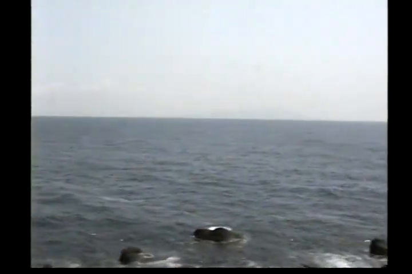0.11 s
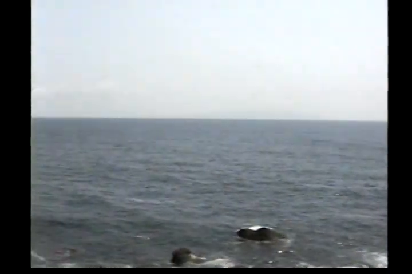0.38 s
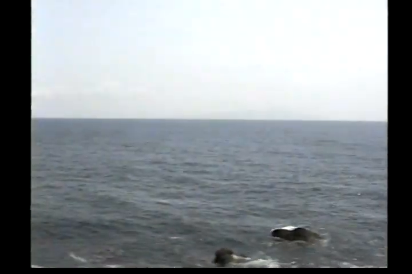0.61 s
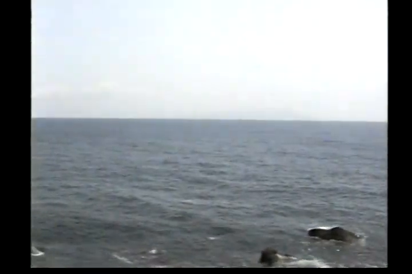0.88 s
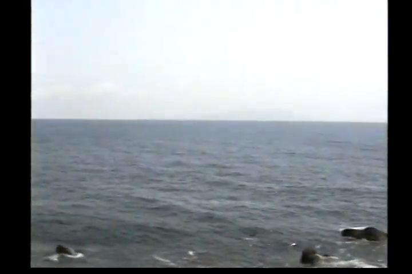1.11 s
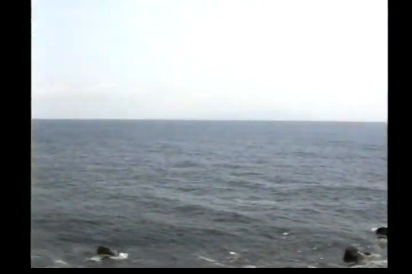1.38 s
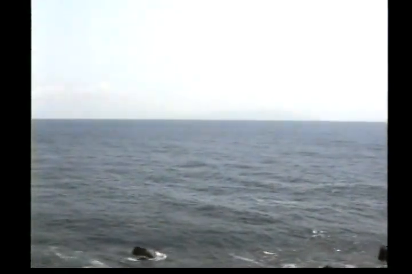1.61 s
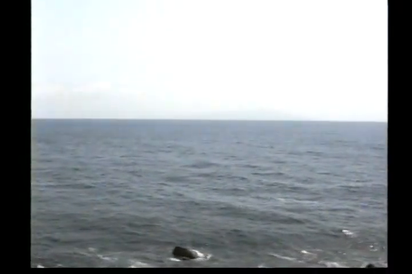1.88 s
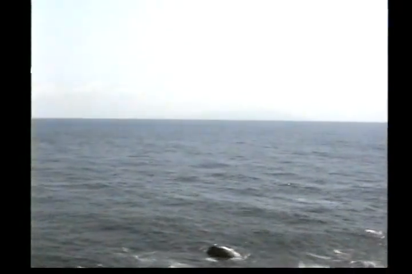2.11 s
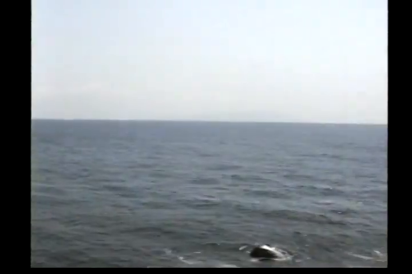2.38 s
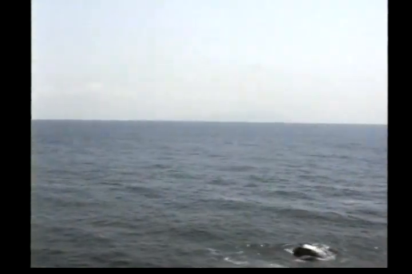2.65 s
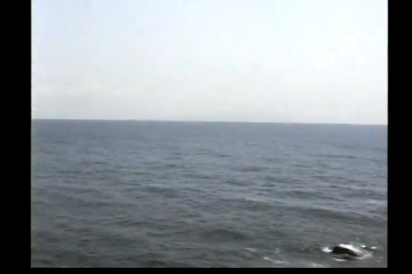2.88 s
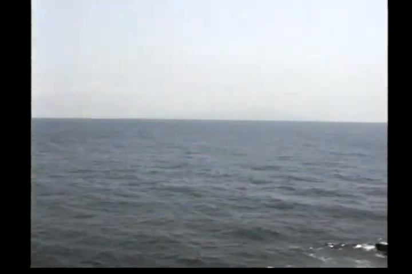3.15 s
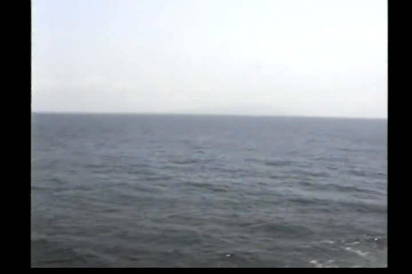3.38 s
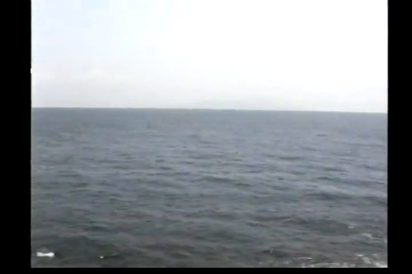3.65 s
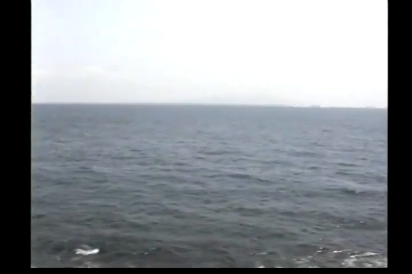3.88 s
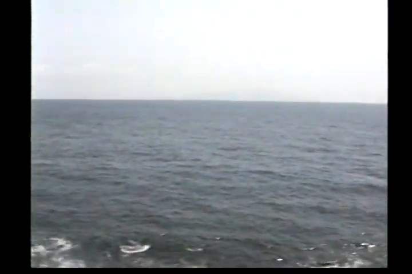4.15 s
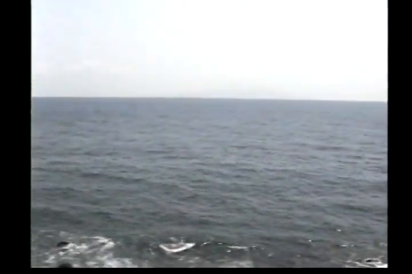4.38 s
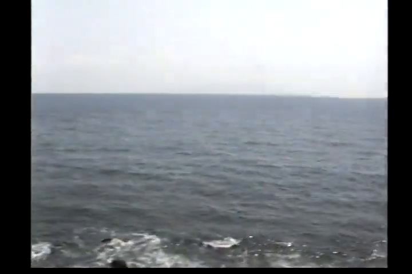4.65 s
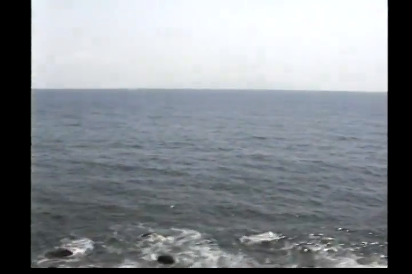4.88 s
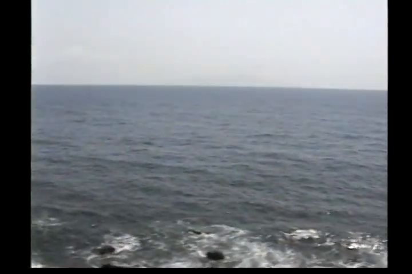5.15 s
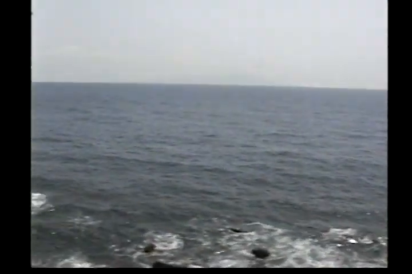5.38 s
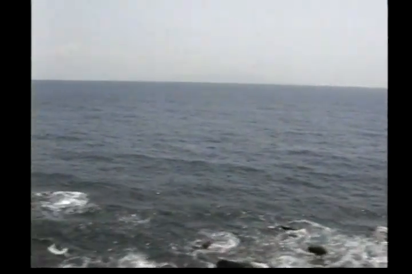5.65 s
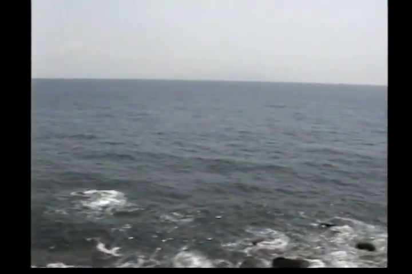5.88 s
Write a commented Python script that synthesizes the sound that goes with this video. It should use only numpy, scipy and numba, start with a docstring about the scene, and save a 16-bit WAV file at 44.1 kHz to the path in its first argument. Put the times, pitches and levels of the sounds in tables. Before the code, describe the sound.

On board an electric train, close to an open window by the sea. A rough, steady wheel roar with airy hiss runs throughout over a motor hum of constant pitch, near 300 hertz with higher overtones. Wind hits the microphones at once, with a strong thump at 0.36 s that ducks the whole sound before it creeps back. A hard clack lands at 0.65 s. The image is narrow, widens from 1 to 2 s, then narrows again. From 2.1 to 3.4 s clacks, sharp ticks and chattering metal thicken, and the roar swells around 3 s. More gusts pump the level near 3.8-4.1 s. Rattles return at 4.5-4.8 s as the hum surges, then drops at about 4.85 s, with a weak return near 5.6 s. The sound is wide again, with fluttering buffets around 5.1 s and sharp metal blows at 5.94 s.

```python
"""Windy train window

On board an electric train by the sea, two microphones at an open window: filtered noise makes wheel roar and
air hiss, sines the motor hum, rung noise bursts the axles' clacks over rail joints and loose metal's chatter.
Wind buffets the microphones with short low waves and pumps the gain control;
a loose contact flips the sound between two microphones and the right one alone."""
import sys
import numpy as np
from scipy import signal
from scipy.io import wavfile
from scipy.ndimage import uniform_filter1d, minimum_filter1d
from numba import njit

SR = 44100
rng = np.random.default_rng(int(sys.argv[2]) if len(sys.argv) > 2 else 0)


def gain_from_decibels(decibels):
    """Convert decibel values to linear amplitude factors."""
    exponent = np.asarray(decibels, float) / 20
    return 10 ** exponent


def store_pcm(level_fs):
    """Save levels as 16-bit WAV."""
    pcm = np.round(np.clip(level_fs, -1, 1) * 32767).astype(np.int16)
    wavfile.write(sys.argv[1], SR, np.atleast_2d(pcm).T)


N = 265257

# wheel roar ahead of the gain control, right side: (time [s], level [dB])
ROAR_LEVEL = [(0, -23), (.15, -26), (.3, -23), (.4, -26.5), (.55, -27), (.86, -23), (.9, -24.5),
              (.94, -23.5), (1.02, -23), (1.12, -24.5), (1.25, -23.5), (1.4, -26.5), (1.55, -27),
              (1.68, -27), (2.05, -27), (2.27, -23.5), (2.4, -25.5), (2.85, -28.5), (3.0, -19),
              (3.3, -20.5), (3.5, -28), (3.87, -28.5), (4.0, -28), (4.15, -27.5), (4.4, -28), (4.48, -25),
              (4.64, -22.5), (4.66, -27.5), (4.72, -24.5), (4.8, -22.5), (4.86, -27), (5.0, -29),
              (5.25, -25.5), (5.55, -30.5), (6.01, -25)]
# low wind rumble on the microphones: (time [s], level [dB])
RUMBLE_LEVEL = [(0, -61), (.2, -45), (.33, -45), (.4, -49), (.5, -51), (.6, -40.5), (1.0, -42), (1.05, -65),
                (1.22, -62), (1.3, -47.5), (1.8, -46), (1.88, -64), (2.1, -56), (2.3, -38.5), (2.5, -54),
                (2.57, -69), (2.72, -51), (2.9, -45), (3.35, -39), (3.42, -56), (3.58, -54), (3.8, -38.5),
                (4.3, -42.5), (4.42, -64), (4.5, -41), (4.65, -52), (5.0, -42.5), (5.2, -42), (5.45, -42),
                (5.75, -38), (6.01, -39.5)]
THRESHOLD_DB = -27  # of the gain control
JOLT_LEFT_DB = 3.5  # impacts: left over right


def unit(x):
    """Scale to rms 1."""
    return x / np.sqrt(np.mean(x ** 2))


def curve(table, column):
    """One column of a table, sample by sample."""
    points = np.array(table)
    return np.interp(np.arange(N) / SR, points[:, 0], points[:, column])


def band(x, hz, width_hz):
    """Band-pass along time."""
    edges_hz = [max(hz - width_hz / 2, 10), min(hz + width_hz / 2, .45 * SR)]
    return signal.sosfilt(signal.butter(2, edges_hz, "bandpass", fs=SR, output="sos"), x)


def walk(rate_hz):
    """Random levels held 1 / rate_hz s and slewed twice; spread near 1."""
    k = int(SR / rate_hz)
    steps = np.repeat(rng.standard_normal(N // k + 1), k)
    return 1.31 * uniform_filter1d(uniform_filter1d(steps, k), k)[:N]


def add(out, s, sound):
    """Mix a short sound in, centred on s."""
    i = int(s * SR) - sound.shape[1] // 2
    out[:, i:i + sound.shape[1]] += sound[:, :N - i]


def swell():
    """How far the roar stands above its usual level, in dB."""
    usual_db = -24
    return curve(ROAR_LEVEL, 1) - usual_db


def rushing(spectrum, flutter_db, flicker_db, rate_hz, treble_db):
    """Noises a third of an octave apart flutter together and flicker alone, the bass most."""
    # share of the right side's noise added on the left, negative = opposite: (frequency [Hz], share)
    likeness = [(60, -.8), (300, -.3), (900, .0), (2200, -.5), (4500, .45)]
    like_hz, share = np.transpose(likeness)
    hz, db = np.transpose(spectrum)
    out, flutter = 0, walk(rate_hz)
    for f in hz[0] * 2 ** np.arange(1 / 6, np.log2(hz[-1] / hz[0]), 1 / 3):
        flicker = flicker_db * (1 + 175.0 / max(f, 90.)) * walk(rate_hz)
        gain_db = np.interp(np.log(f), np.log(hz), db) + flutter_db * flutter + flicker
        gain_db = gain_db + treble_db * np.clip(2 * np.log2(f / 920.0), 0, 1)
        noise = rng.standard_normal((2, N))
        noise[0] += np.interp(np.log(f), np.log(like_hz), share) * noise[1]
        out = out + gain_from_decibels(gain_db) * band(noise, f, f / 4)
    return unit(out)


def rush():
    """Wheel roar and air hiss swell together; the left microphone faces the window."""
    # spectra: (frequency [Hz], relative density [dB per Hz])
    roar_spectrum = [(25, 4.5), (50, -10), (80, -25.5), (140, -13), (200, -14.5), (300, -1), (420, 1.5),
                     (820, -1), (1100, -4), (1350, -9), (1600, -16.5), (1850, -16), (2200, -16),
                     (2800, -23), (3500, -28.5), (4500, -32.5)]
    hiss_spectrum = [(2500, -3.5), (3700, -0.5), (4500, -2.5), (6600, 3.5), (8200, -6), (9500, 0),
                     (10800, -14)]
    # over the usual share: (time [s], treble of the roar [dB], hiss [dB])
    treble = [(0, -1.5, 3), (.2, -2.5, 1), (.45, -1.5, .5), (.8, 0, -0.2), (1.2, 1, -1.3), (1.8, 1.5, 0.1),
              (2.4, -0.2, 1.2), (3.1, 1.5, -1), (3.6, -0.4, -0.6), (4.2, 0, 2.5), (4.6, 2.3, 0),
              (5.2, 0.8, -1), (6.01, 0.8, -1)]
    roar = rushing(roar_spectrum, 0.68, 1.66, 20.0, curve(treble, 1)) * gain_from_decibels([[3.6], [0]])
    hiss_db = -16 + 0.076 * swell()  # relative to the roar
    hiss = rushing(hiss_spectrum, 0.55, 1.0, 5.6, curve(treble, 2)) * gain_from_decibels([[4.], [0]])
    return gain_from_decibels(curve(ROAR_LEVEL, 1)) * (roar + gain_from_decibels(hiss_db) * hiss)


def hum():
    """Motor overtones drop when the power goes off; phases wander slowly at random, mostly at the left."""
    # overtones ahead of the load: (multiple of the turning rate, rms level [dB])
    overtones = [(4, -31), (6, -41.5), (7, -53), (8, -66.5), (9, -42.5), (10, -41), (11, -48), (12, -48),
                 (14, -44.5), (17, -48), (19, -52.5), (20, -65), (21, -86)]
    # turning rate of the motor: (time [s], rate [Hz])
    turning = [(0, 74.3), (6.01, 74.44)]
    # motor load: (time [s], level [dB])
    load = [(0, -1), (.1, -5), (.15, -12), (.2, -7), (.25, 1), (.34, -2.5), (.42, 1), (.6, 1), (.7, -6),
            (.95, -6), (1.03, 1), (1.3, -3.5), (1.55, -6), (1.85, 1), (2.0, 1.5), (2.2, -2.5), (2.4, 4),
            (2.55, -0.5), (2.75, -0.5), (3.0, -2), (3.3, 1), (3.6, -2), (4.15, -2), (4.5, 1), (4.63, 5.5),
            (4.68, -6), (4.74, 3.5), (4.83, 5), (4.88, -8.5), (5.5, -20), (5.6, -3), (5.75, -7),
            (5.85, -11), (6.01, -9)]
    left_db, waver_db, left_rad, wander_rad = -0.5, 1.3, 0.21, 0.22
    turns = np.cumsum(curve(turning, 1)) / SR
    out = 0
    for k, db in overtones:
        phase_rad = np.array([left_rad + wander_rad * walk(1.5), .08 * walk(8.)])
        level_db = db + waver_db * (walk(6.87) + walk(25.06))
        out = out + gain_from_decibels(level_db) * np.sin(2 * np.pi * (k * turns + rng.random()) + phase_rad)
    return np.sqrt(2) * out * gain_from_decibels(curve(load, 1)) * gain_from_decibels([[left_db], [0]])


def rumble():
    """Turbulence shakes the diaphragms in ragged low gusts, mostly opposite left and right."""
    gust_db, deep_db = 6.5, -7
    noise = rng.standard_normal((2, N))
    noise[0] = .6 * noise[0] - .8 * noise[1]
    both = unit(band(noise, 130, 173)) + gain_from_decibels(deep_db) * unit(band(noise, 46.0, 40.))
    return gain_from_decibels(curve(RUMBLE_LEVEL, 1) + gust_db * walk(25.)) * both


def ticks():
    """Sharp blows, each with two bounces, ring the fittings briefly; small ones grow as the roar swells."""
    # single hard metal blows: (time [s], level [dB], extra level of the bright ring [dB])
    hard = [(.291, -22, -3), (.651, -14.5, 4), (.886, -21, -6), (.903, -18, 4), (1.46, -23, -14),
            (2.146, -23, -2), (2.539, -28, -4), (2.719, -21, -4), (2.811, -22, -8), (2.823, -15, 3),
            (2.91, -24, 0), (3.413, -23, -8), (4.062, -27, -8), (4.084, -28, -6), (4.669, -15, -4),
            (4.716, -23, -4), (4.817, -18, -4), (5.346, -21, -9.5), (5.933, -16, -5), (5.943, -12.5, -1)]
    # resonances of the fittings: (frequency [Hz], width [Hz], level [dB])
    fittings = [(800, 490, -2), (1330, 820, -5), (2300, 1080, -8.5), (3560, 1440, -11.5),
                (6000, 3000, -20.5)]
    small_per_s, small_db, scatter_db, db_per_swell_db = 120, -37.5, 4, 1.2
    c = rng.random((int(small_per_s * N / SR), 3))
    s = c[:, 0] * (N / SR - .02)
    db = small_db + db_per_swell_db * swell()[(s * SR).astype(int)] - scatter_db * np.log(1 - c[:, 1])
    small = np.column_stack([s, db, -8 * c[:, 2]])
    s, db, bright_db = np.vstack([hard, small]).T
    dull, bright = np.zeros((2, N)), np.zeros((2, N))
    for late_s, bounce_db in [(0, -2), (.0022, -5.5), (.0055, -9.5)]:
        c = rng.random((len(s), 3))
        at = np.minimum(((s + late_s * (.5 + c[:, 0])) * SR).astype(int), N - 1)
        sign = np.sign(c[:, 1] - .5)
        for side in range(2):
            level = gain_from_decibels(db + bounce_db + JOLT_LEFT_DB * (1 - side))
            size = level * sign * (.7 + .6 * c[:, 2] * side)
            np.add.at(dull[side], at, size)
            np.add.at(bright[side], at, size * gain_from_decibels(bright_db))
    out = 0
    for k, (f, w, db) in enumerate(fittings):
        blows = dull if k < 2 else bright
        out = out + gain_from_decibels(db) * SR / (2 * w) * band(blows, f, w)
    return out


def jolts():
    """Rows of impacts: axles over each rail joint, uneven, harder where the roar swells; further knocks."""
    # further knocks of the car body, many of them together with an axle's clack:
    # (time [s], clack [dB], rattle [dB], ring [Hz], length scale [ms])
    knocks = [(.545, -22, -31.5, 790, 27), (.654, -7.5, -29, 674, 9.3), (.892, -20, -29, 900, 15),
              (2.045, -24.5, -35.5, 900, 20.3), (2.155, -13.5, -54, 560, 24.2), (2.277, -33, -42, 593, 17),
              (2.815, -14, -39, 1030, 8.9), (.835, -22, -42, 710, 14.8), (3.535, -20, -51, 510, 19.7),
              (2.722, -17.5, -28, 900, 9.8), (4.088, -18, -41, 644, 19), (5.943, -20, -34, 970, 17),
              (.294, -23, -42, 730, 20), (.215, -25, -41, 740, 25.5), (1.185, -22.5, -34, 770, 23),
              (2.542, -19, -40, 850, 10.3), (2.19, -22, -31, 830, 8.3), (2.3, -16.5, -36, 800, 13.3),
              (2.452, -18.5, -29.5, 880, 13.7), (2.783, -25, -32, 770, 20.8), (2.829, -12, -27, 780, 17.9),
              (3.019, -17, -26, 840, 10.7), (3.163, -18, -40, 970, 28), (3.435, -20, -46, 550, 27.6),
              (3.557, -19, -36.5, 695, 24.7), (3.857, -20.5, -31, 720, 10.1), (4.5, -20, -40, 750, 17.6),
              (4.615, -36, -41, 800, 14), (5.7, -22, -34, 766, 12.3), (.06, -30, -47, 650, 30),
              (1.466, -18.5, -48, 700, 17.2), (1.557, -18.5, -44, 820, 15.3), (1.578, -19, -46, 520, 13),
              (1.485, -17, -46, 620, 13.4), (3.417, -16.5, -35, 840, 12), (5.28, -24, -44, 750, 22),
              (5.38, -23.5, -44, 480, 14), (5.062, -22, -36, 700, 9.3), (5.35, -21, -44, 840, 10.3)]
    # the same axles pass in the same order on every rail:
    # (time after the rail's start [s], clack [dB], rattle [dB], mean ring [Hz], length scale [ms])
    axles = [(.022, -21.5, -38.5, 730, 18), (.205, -21, -32, 800, 12.4), (.303, -19, -35.5, 740, 17.3),
             (.889, -15.5, -37, 830, 19.5), (1.004, -23.5, -35, 690, 22), (1.182, -26.5, -39, 810, 26)]
    # some joints are wider than others: (level [dB]), one per rail
    joints = [0.53, 0.7, -0.78, -1.5, 0.1]
    rail_s, scatter_db, ring_spread_hz, db_per_swell_db = 1.2622, 3.5, 56, 0.51
    rows, more_db = list(knocks), db_per_swell_db * swell()
    for rail, joint_db in enumerate(joints):
        chances = rng.standard_normal((len(axles), 2))
        for (after_s, clack_db, rattle_db, hz, ms), c in zip(axles, chances):
            s = rail * rail_s + after_s
            if 4 * ms / 1000 < s < N / SR:
                db = joint_db + more_db[int(s * SR)] + scatter_db * c[0]
                rows.append((s, clack_db + db, rattle_db + db, hz + ring_spread_hz * c[1], ms))
    return rows


def burst(ms, rise):
    """Gritty noise, unrelated left and right, and its envelope: quick rise, longer tail."""
    grit_db = 3.5 * rng.standard_normal(256).repeat(64)
    noise = rng.standard_normal((2, 16384)) * gain_from_decibels(grit_db)
    half = int(1.8 * ms * SR / 1000)
    t = np.arange(-half, half) / SR * 1000 / ms + 0.19  # in units of ms
    shape = np.where(t < 0, np.exp(-(t / rise) ** 2), np.exp(-(np.abs(t) / 0.77) ** 0.96))
    return noise[:, :len(t)], shape


def clacks(rows):
    """A burst of small impacts rings the panels, most of all those near the clack's pitch."""
    # body panels: (frequency [Hz], width [Hz], level [dB])
    panels = [(435.5, 126, 11.5), (614, 91, 2.5), (800., 228, 1.5), (952, 230, -4.5), (1320, 2000, -16.5)]
    out = np.zeros((2, N))
    for s, clack_db, _, hz, ms in rows:
        noise, shape = burst(ms, .22)
        ring = 0
        for f, w, db in panels:
            near_db = db - 34.5 * np.log(f / hz) ** 2
            ring = ring + gain_from_decibels(near_db) * band(shape * noise, f, w) / np.sqrt(w)
        level = gain_from_decibels([[clack_db + JOLT_LEFT_DB], [clack_db]])
        add(out, s, level * unit(ring) * np.sqrt(np.mean(shape ** 2)))
    return out


def rattles(rows):
    """Loose parts chatter; brighter rattles favour the upper resonances."""
    # rattling pane: (frequency [Hz], width [Hz], level [dB])
    pane = [(2140, 640, 6.5), (3350, 920, 2.5), (6900, 3800, 4.5)]
    out = np.zeros((2, N))
    for s, _, rattle_db, _, ms in rows:
        bright_hz = 2640 + 42 * rng.standard_normal()
        noise, shape = burst(ms, .32)
        noise[0] -= .5 * noise[1]  # the pane swings towards one microphone and away from the other
        ring = 0
        for f, w, db in pane:
            tilt = (f / 2500) ** ((bright_hz - 2700) / 530.0)
            ring = ring + gain_from_decibels(db) * tilt * unit(band(noise, f, w))
        add(out, s, gain_from_decibels([[rattle_db + JOLT_LEFT_DB], [rattle_db]]) * shape * unit(ring))
    return out


def eddies():
    """Small buffets at random moments, stronger with the rumble: rows like those of the strong ones."""
    per_s, mean_db, scatter_db, mid_hz, mid_ms = 15, -27.5, 0.5, 250, 17.3
    db_per_rumble_db, usual_rumble_db = 0.77, -47
    c = rng.standard_normal((int(per_s * N / SR), 3))
    s = .1 + (N / SR - .2) * rng.random(len(c))
    gust_db = db_per_rumble_db * (curve(RUMBLE_LEVEL, 1)[(s * SR).astype(int)] - usual_rumble_db)
    db = mean_db + gust_db + scatter_db * c[:, 0]
    hz, ms = mid_hz * np.exp(0.259 * c[:, 1]), mid_ms * np.exp(0.43 * c[:, 2])
    return np.column_stack([s, db, hz, ms]).tolist()


def buffets():
    """Eddies flap the diaphragms for a few uneven cycles, nearly opposite left and right; little deep bass."""
    # strong buffets: (time [s], right level [dB], nominal pitch [Hz], length scale [ms])
    strong = [(0.102, -12, 201, 5.9), (0.3586, 0.5, 155, 7.8), (0.525, -23, 268, 6.4),
              (0.659, -11, 150, 14), (.659, -7.5, 294, 11), (.757, -9, 232, 11), (0.877, -14.5, 157, 12.5),
              (.978, -15, 219, 13.4), (1.018, -19, 330, 12), (1.279, -7, 280, 4), (1.294, -8.5, 300, 5),
              (1.365, -14, 295, 5.1), (1.51, -17.5, 226, 8), (1.659, -15.5, 249, 5.3),
              (1.758, -11.5, 201, 7.2), (1.872, -15.5, 250, 4.4), (2.148, -23, 356.4, 15),
              (2.478, -15.5, 345, 4.6), (2.522, -26.5, 136, 18), (2.78, -29, 121, 22),
              (2.914, -12, 250, 3.5), (2.957, -12.5, 257, 15), (2.988, -18.5, 193, 16),
              (3.081, -17.5, 272, 19), (3.178, -10, 237, 8.1), (3.257, -22.5, 160, 22),
              (3.369, -18.5, 198, 13), (3.504, -25, 320, 41), (3.568, -28, 392, 6), (3.645, -12, 260, 9.4),
              (3.76, -19.5, 322, 14), (3.815, -24, 301, 6.9), (3.941, -20, 326, 5), (.772, -15, 250, 7.8),
              (4.497, -17.5, 214, 6.6), (4.535, -17, 221, 4), (4.549, -14.5, 201, 4), (4.576, -14, 250, 6),
              (4.715, -23, 300, 4.4), (4.818, -25, 306, 4.8), (3.858, -12, 298, 10.1),
              (4.471, -25, 109, 12), (4.501, -21.5, 130, 33), (4.54, -28, 221, 44), (4.571, -24.5, 305, 37),
              (4.847, -16, 232, 7.1), (4.902, -18, 220, 21), (4.928, -14.5, 253, 4.2),
              (5.027, -9.5, 266.6, 4.5), (5.065, -16, 300, 7.6), (5.111, -13, 260, 4),
              (5.129, -8, 266, 3.6), (5.161, -6, 300, 4.8), (5.326, -19, 246.6, 8.5),
              (5.352, -17, 294, 6.6), (5.417, -15, 368, 3.7), (5.5, -29, 263, 23), (5.735, -27, 280, 27),
              (5.776, -15, 215, 12), (5.872, -9, 250, 14.6), (5.951, -11, 400, 9.9), (5.973, -8.5, 296, 5)]
    # side the wind strikes harder: (time [s], left over right [dB])
    wind_side = [(0, -3), (1.0, -18), (1.28, 6.5), (1.37, -6), (1.52, 7), (1.66, 3.5), (1.87, 2.5),
                 (3.4, 0.5), (3.65, 0.5), (4.85, 6), (5.45, 4.5), (5.78, 1.5), (5.87, -20), (6.01, 0)]
    side_scatter_db = 4.5
    peak = -0.23  # strongest point, -1 = start, 1 = end
    # a low thump behind each strong buffet
    thumps = [(s + 0.0046, db - 15, 121.6, 17.7) for s, db, hz, ms in strong]
    rows = list(strong) + thumps + eddies()
    side_db = curve(wind_side, 1)
    out = np.zeros((2, N))
    for (s, db, hz, ms), chance in zip(rows, rng.random((len(rows), 5))):
        t = np.linspace(-1, 1, int(2.189 * ms * SR / 1000))
        cycles = hz * 1.118 * ms / 1000 * (t - 0.19 * t ** 2)  # the flapping slows down
        left_rad = np.pi + 1.2 * (chance[1] - .5)
        phase = 2 * np.pi * (cycles + chance[0]) + np.array([[left_rad], [0]])
        flap = np.sin(phase)
        flap += 0.48 * np.sin(phase * 0.616 + 6 * chance[2])
        flap += 0.44 * np.sin(phase * 1.635 + 6 * chance[3])
        left_db = db + side_db[int(s * SR)] + side_scatter_db * (2 * chance[4] - 1)
        shape = np.cos(np.pi / 2 * np.interp(t, [-1, peak, 1], [-1, 0, 1])) ** 2
        add(out, s, gain_from_decibels([[left_db], [db]]) * flap * shape)
    return signal.sosfiltfilt(signal.butter(3, 70, "highpass", fs=SR, output="sos"), out)


def shoves():
    """One slow bump of wind pressure each, alike on both microphones."""
    # deep shoves: (onset [s], bump peak over the gain control's threshold [dB])
    pushes = [(0.101, 14), (0.3575, 24.5), (0.758, 4), (0.842, 6), (1.269, 4.5), (1.873, 8.5), (2.193, 6),
              (2.478, 5.5), (2.923, 5.5), (2.992, 8), (3.181, 7.5), (3.648, 8), (3.815, 11.5), (3.864, -11),
              (3.945, 13), (4.111, 8), (5.072, 4), (5.129, 10.5), (5.423, 9.5)]
    out, bump = np.zeros((2, N)), np.hanning(int(.02 * SR))
    for s, db in pushes:
        add(out, s + 0.0039, gain_from_decibels(db + THRESHOLD_DB) * bump[None])  # the peak follows the onset
    return out


def scrapes():
    """Loose metal chatters: dense uneven clicks through a broad bright resonance, in clumps."""
    # bursts: (start [s], end [s], right level [dB], centre [Hz])
    chatter = [(0.269, 0.353, -43, 2500), (0.701, .76, -37.5, 2300), (0.877, 0.912, -30, 2250),
               (0.989, 1.03, -36.5, 2200), (1.16, 1.259, -43, 2200), (2.238, 2.324, -33.5, 2880),
               (2.362, 2.4, -35, 2760), (2.449, 2.476, -42, 2820), (2.824, 2.868, -38, 3020),
               (2.88, 2.927, -40, 2600), (3.013, 3.185, -37.5, 2670), (3.25, 3.365, -39, 2570),
               (3.41, 3.453, -40, 2400), (5.325, 5.357, -41, 2200), (4.46, 4.557, -36, 2300),
               (4.547, 4.65, -37, 2600), (4.67, 4.72, -41, 2200), (4.725, 4.827, -36, 2760),
               (5.23, 5.275, -40, 2500), (5.9, 5.993, -44, 2500)]
    grit_db, edge_s, width_over_centre = 1, 0.0047, 1.09
    out = np.zeros((2, N))
    for start, end, db, hz in chatter:
        clicks = rng.standard_normal((2, 16384)) * gain_from_decibels(grit_db * rng.standard_normal(1024).repeat(16))
        clumps = gain_from_decibels(2.7 * uniform_filter1d(rng.standard_normal(64).repeat(256), size=128))
        t = np.arange(int((end - start) * SR)) / SR
        shape = np.clip(np.minimum(t, (end - start - t) / 2) / edge_s, 0, 1)  # fade-out twice as long
        ring = unit(band(clicks, hz, width_over_centre * hz)) + gain_from_decibels(-6.5) * unit(band(clicks, 6300, 5700))
        level = gain_from_decibels([[db + JOLT_LEFT_DB], [db]])
        add(out, (start + end) / 2, level * shape * (clumps * ring)[:, :len(t)])
    return out


def scene():
    """Everything that reaches the two microphones."""
    rows = jolts()
    train = rush() + hum() + ticks() + clacks(rows) + rattles(rows) + scrapes()
    wind = rumble() + buffets() + shoves()
    return train + wind


@njit
def hold(over_db, keep):
    """Jump up at once, sink back slowly."""
    out, e = np.empty(len(over_db)), 0.
    for i in range(len(over_db)):
        e = max(over_db[i], e * keep)
        out[i] = e
    return out


def gain_control(x):
    """Deep bass over the threshold pulls each side's gain down at once; it creeps back."""
    recovery_s = 0.11
    bass = signal.sosfiltfilt(signal.butter(3, 75, fs=SR, output="sos"), x)
    over_db = 20 * np.log10(np.abs(bass) + 1e-9) - THRESHOLD_DB
    keep = np.exp(-1 / (recovery_s * SR))
    cut_db = np.array([hold(side, keep) for side in over_db])
    return x * gain_from_decibels(-cut_db)


def loose_contact(x):
    """An open contact feeds the right microphone to both sides; it crackles in sharp opposite steps."""
    # contact closed, both microphones get through: (start [s], end [s])
    wide = [(1.001, 1.926), (1.94, 1.958), (1.971, 1.993), (2.018, 2.057), (2.102, 2.126), (3.362, 3.585),
            (3.636, 3.652), (4.812, 6.02)]
    # crackles: (time [s], left level [dB], right level [dB])
    crackles = [(1.868, -20, -20), (3.365, -30, -23), (3.643, -27, -18), (3.646, -30, -16),
                (3.6505, -40, -17), (5.545, -24, -38)]
    dropouts_per_s, dropout_s = 7, .009
    t, out = np.arange(N) / SR, x.copy()
    slips = rng.random(N) < dropouts_per_s / SR  # brief openings at random
    held = minimum_filter1d(1. - slips, size=int(dropout_s * SR))
    touching = sum((t >= a) & (t < b) for a, b in wide)
    closed = uniform_filter1d(held * touching, size=40)
    out[0] = closed * x[0] + (1 - closed) * x[1]
    u = np.arange(-600, 600) / SR
    step = np.sign(u) * np.exp(-np.abs(u) / .0012)
    for s, left_db, right_db in crackles:
        add(out, s, gain_from_decibels([[left_db], [right_db]]) * [[-1], [1]] * step)
    return out


def top_cut(x):
    """Nothing passes above the cut-off."""
    return signal.sosfilt(signal.butter(12, 10880, fs=SR, output="sos"), x)


def record(dry):
    """Gain control, steady recorder hiss, bass cut, soft ceiling, loose contact, treble cut."""
    hiss_db = -63.5
    x = gain_control(dry) + gain_from_decibels(hiss_db) * rng.standard_normal((2, N))
    x = signal.sosfilt(signal.butter(2, 42., "highpass", fs=SR, output="sos"), x)
    x = loose_contact(np.tanh(2.205 * x) / 2.962)
    x = signal.sosfilt(signal.ellip(12, .2, 80, 10350, fs=SR, output="sos"), x)
    return top_cut(x)


dry = scene()
out = record(dry)
store_pcm(out)
```